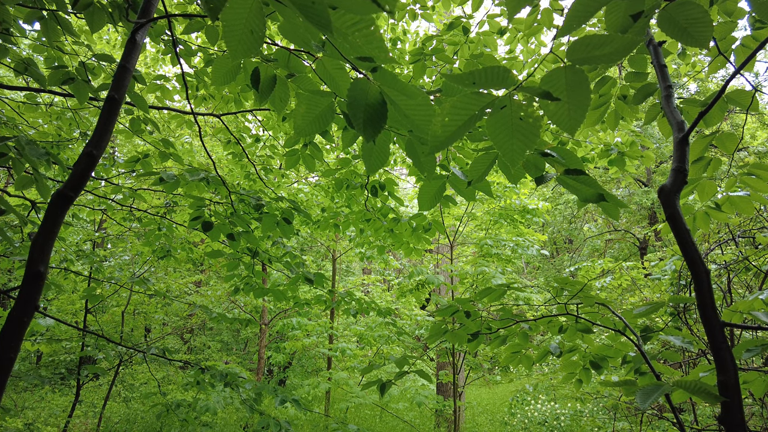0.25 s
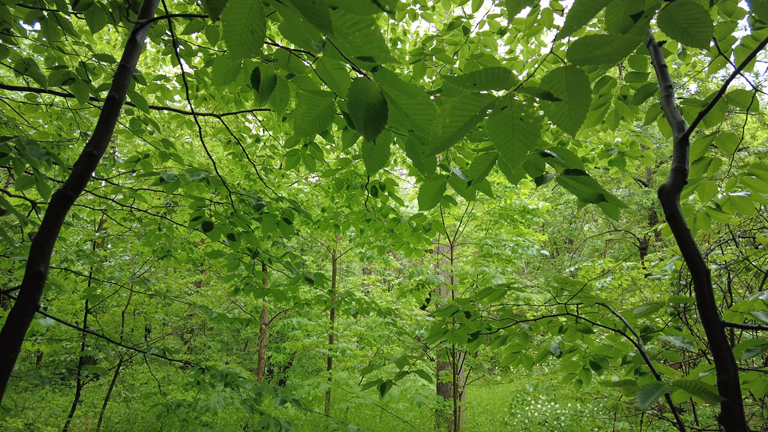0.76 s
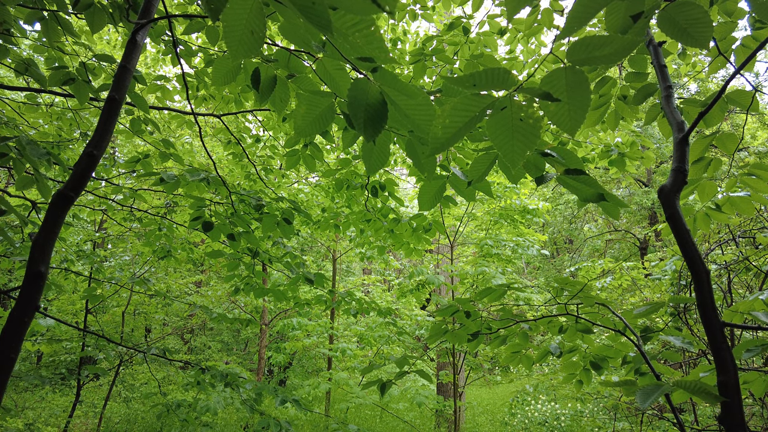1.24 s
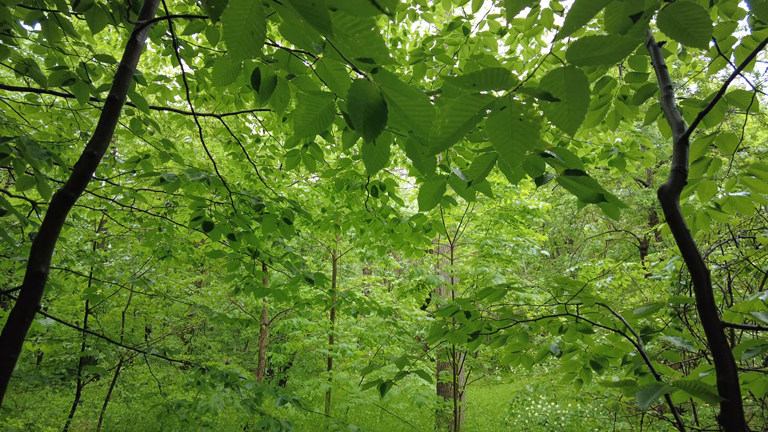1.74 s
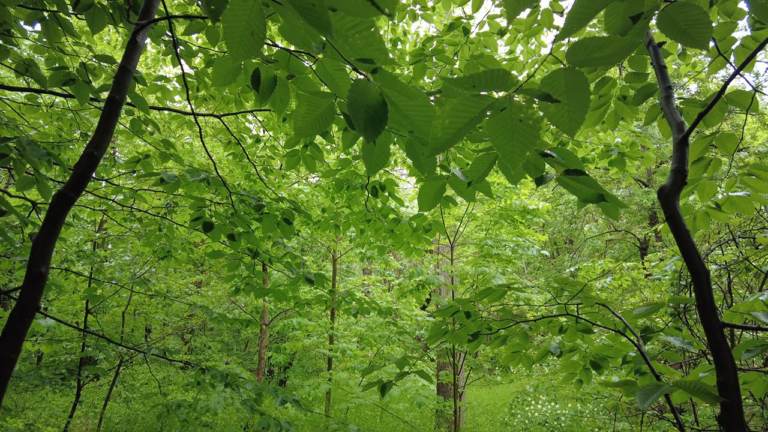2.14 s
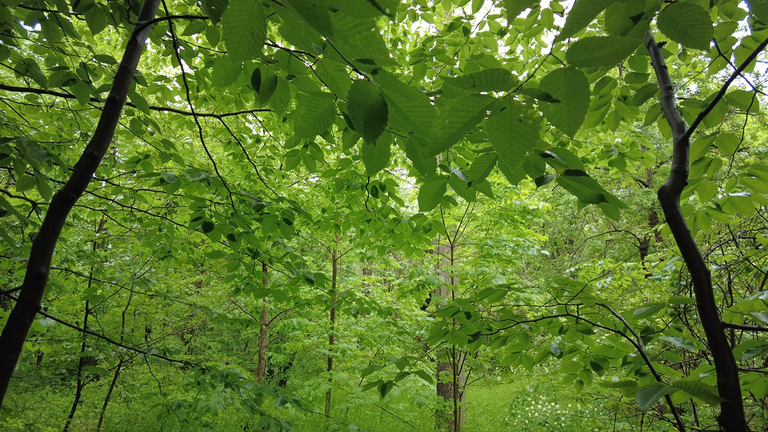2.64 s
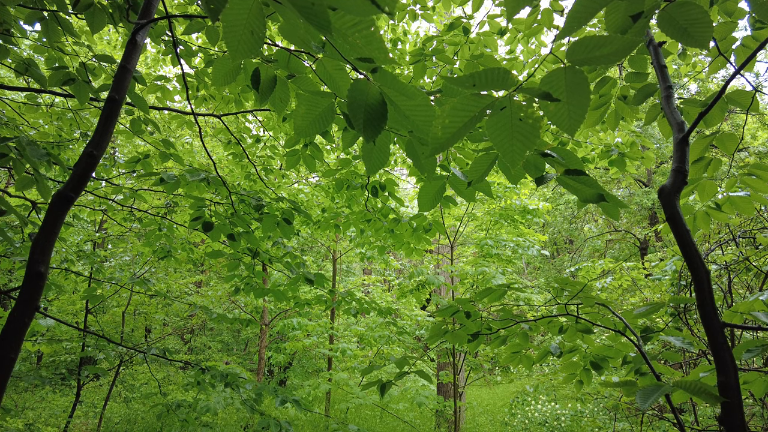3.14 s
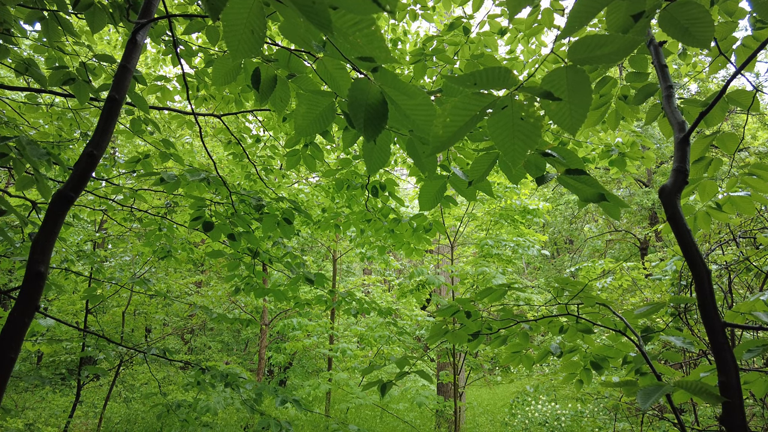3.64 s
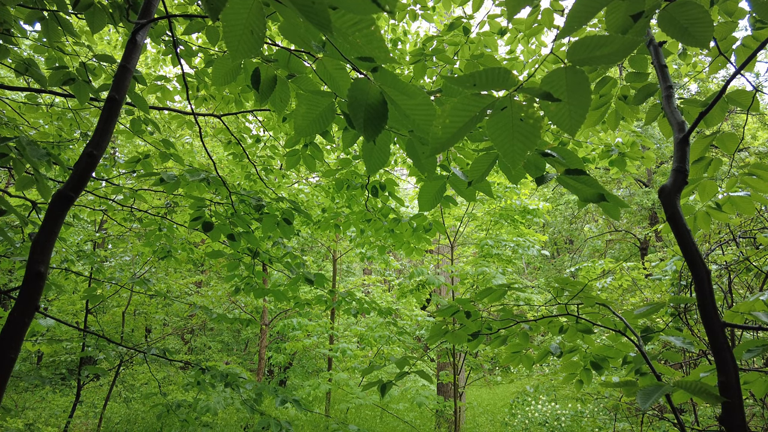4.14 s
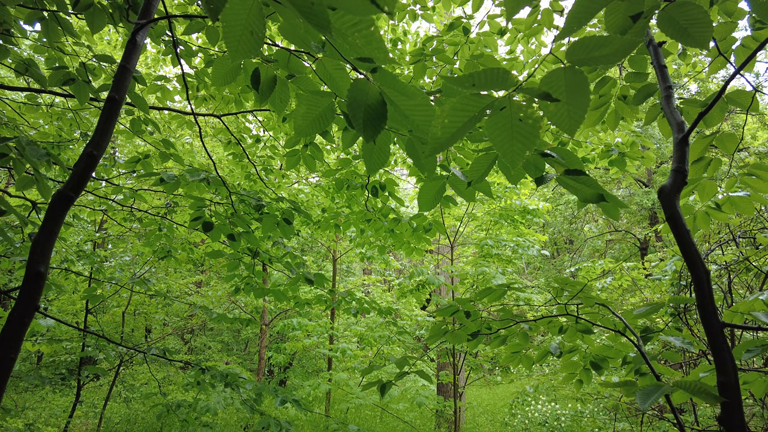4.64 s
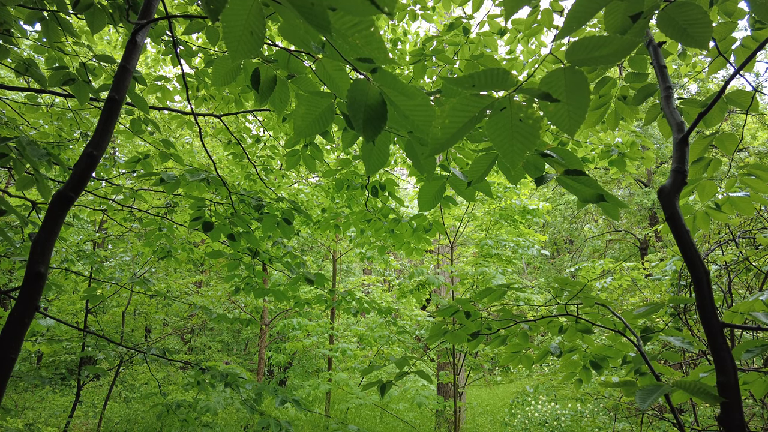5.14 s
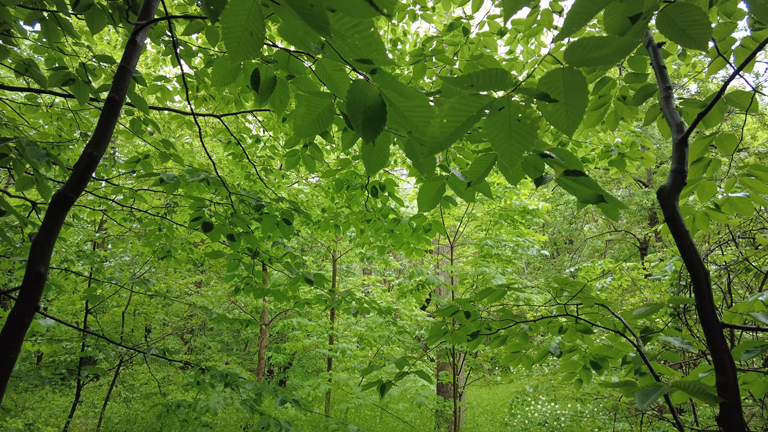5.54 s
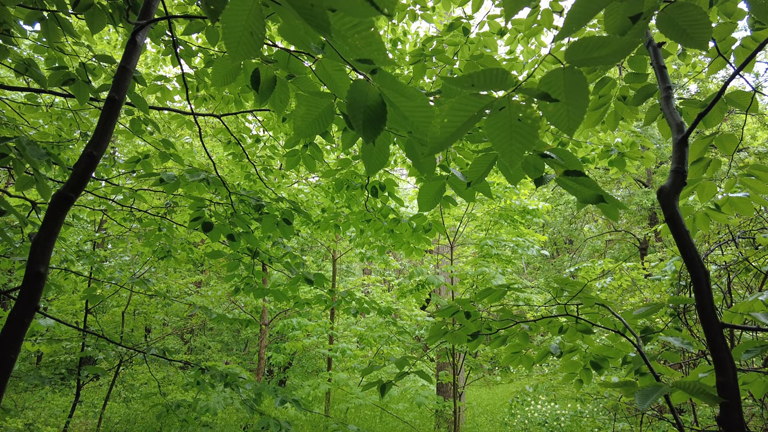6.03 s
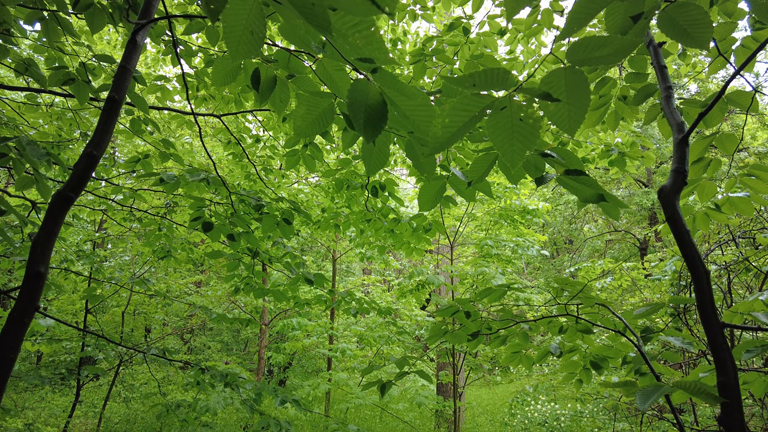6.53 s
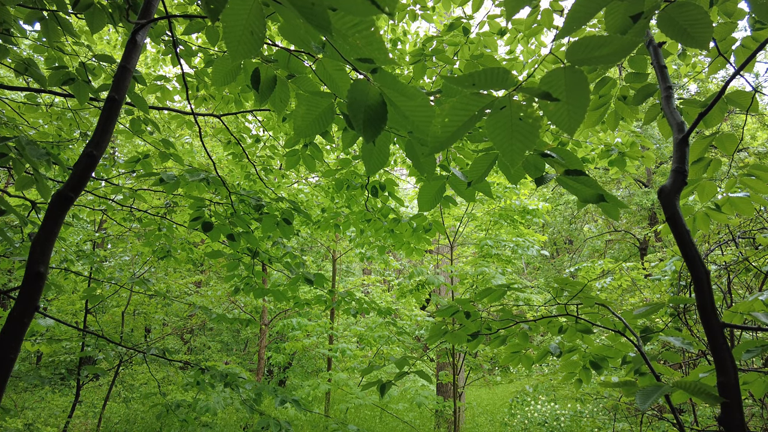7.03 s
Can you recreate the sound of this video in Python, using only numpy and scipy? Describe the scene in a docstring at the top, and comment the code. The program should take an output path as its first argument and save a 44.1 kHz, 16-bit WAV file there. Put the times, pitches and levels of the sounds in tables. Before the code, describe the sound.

A leafy wood in light rain, heard in stereo from beneath the branches for about seven seconds. Nearby drops hit leaves irregularly, with soft dull slaps, bright ticks and tiny pings; they are busiest from 0.5 to 2 seconds, with a heavy, lower plop near 1.7, a cluster around 2.6, sparser drops from 3 to 4, then more from 5 to 6 and a firm tap near 6.9. Some shed quick, fine patters. Softer drops surround them, blending into a faint airy hiss with diffuse echoes. A dominant deep rumble of distant traffic runs throughout, wavering most around 4 seconds, with muffled roar and short hollow swells, frequent after 3. A low engine hum pulses and falls until about 2.9; a weaker one grows from 3.6 to 5.7. Very faint, thin bird calls occur near 2.4, 3.2, 4.0, 4.5 and 6.5.

```python
"""A leafy wood in light rain. Drops excite nearby leaves: filtered bursts give a dull slap, a bright tick and a ping.
Shed droplets patter as random impulses, farther drops are softer, and the farthest merge into shaped noise.
Foliage scatters the drops as decaying random echoes. Distant traffic is an uneven rumble with hollow swells,
two engines are falling tones, and small birds give a few faint, thin calls as trilled sine tones."""
import sys
import numpy as np
from scipy import signal
from scipy.fft import rfft, irfft
from scipy.io import wavfile
from scipy.ndimage import uniform_filter1d

SR = 44100
rng = np.random.default_rng(int(sys.argv[2]) if len(sys.argv) > 2 else 0)


def wav_record(signal):
    """Record a signal, one row per channel, as 16-bit PCM in the file named by sys.argv[1]."""
    frames = np.transpose(np.atleast_2d(signal))
    bounded = np.clip(frames, -1, 1)
    # unit amplitude maps onto the largest positive 16-bit level
    quanta = np.round(bounded * 32767).astype(np.int16)
    wavfile.write(sys.argv[1], SR, quanta)


N = 321048
TIME = np.arange(N) / SR

# near drops; a hard strike has a high top: start_s, leaf_hz, leaf_db, spray_hz, spray_db,
# spatter_db (relative to the first burst), top_hz
NEAR_DROPS = [(.072, 2400, -71, 4440, -79, -3, 8000), (.123, 1410, -64.5, 4500, -66, -11, 6000),
              (0.507, 1830, -64, 6060, -61, -1, 17000), (0.6512, 1510, -64, 3020, -83, -1, 8000),
              (.6995, 1080, -64, 4900, -72, -8, 17000), (0.773, 1500, -66.5, 6000, -77, -4, 8000),
              (.859, 2400, -76, 3830, -86, -4, 7000), (0.94, 3400, -78, 3780, -69, 9, 8000),
              (0.976, 2470, -56, 6260, -59, -4, 16000), (1.054, 2800, -69, 5550, -77, 4, 9000),
              (1.1176, 2390, -64.5, 4460, -74, 3, 9000), (1.123, 2600, -73, 4500, -72, -2, 9000),
              (1.298, 3420, -66, 4500, -66.5, 13, 11000), (1.3702, 1990, -62.5, 3350, -71, 2, 4500),
              (1.383, 2480, -57, 6400, -61.5, -22, 9200), (1.537, 2400, -79, 4500, -71.5, 2, 9000),
              (1.628, 2400, -72, 3080, -77, -1, 4500), (1.6692, 1500, -58, 4430, -55.5, 5, 12000),
              (1.6878, 556, -50.5, 2900, -54, -25, 3780), (1.6888, 1530, -55, 3400, -61, -12, 4500),
              (1.794, 2400, -73, 3300, -78, -6, 4500), (1.8305, 1360, -62.5, 4550, -70, 3, 12000),
              (2.0193, 1490, -60.5, 3810, -65.5, -3, 9000), (2.157, 2000, -70, 4500, -79, -2, 7000),
              (2.547, 2510, -66.5, 3900, -75, 1, 5500), (2.585, 1860, -66, 2980, -72, -6, 4000),
              (2.618, 3400, -72, 5500, -73, 13, 11000), (2.631, 3000, -72, 5200, -72, 0, 9000),
              (2.666, 1400, -60, 3140, -56, 1, 8000), (2.673, 2620, -67, 5270, -64, 2, 12000),
              (2.793, 1840, -74, 3000, -70, 0, 9000), (2.853, 2400, -73, 4560, -75, 3, 9000),
              (3.175, 1800, -65.5, 4000, -72, 2, 9000), (3.309, 2790, -72, 5250, -72, -1, 12000),
              (3.49, 900, -60.5, 3180, -66, 11, 14000), (4.012, 800, -79, 4700, -66.5, 9, 5500),
              (4.11, 1490, -66, 4000, -70, -5, 6000), (4.1454, 3150, -62.5, 4670, -67, 1, 11000),
              (4.349, 2240, -69, 3030, -71, -8, 8000), (4.447, 2200, -68.5, 2800, -77, 1, 5000),
              (4.483, 2400, -77, 3100, -80, 0, 4000), (4.615, 796, -64, 2500, -78, -4, 3000),
              (4.8, 1890, -67, 8200, -74, -3, 13000), (4.831, 2000, -75, 3030, -72, 5, 6000),
              (4.991, 2190, -63.5, 4900, -77, -5, 7000), (5.034, 1600, -63, 4200, -71, -6, 14000),
              (5.0717, 1900, -63, 6400, -64.5, -5, 17000), (5.3298, 2260, -64.5, 5200, -72, 9, 8000),
              (5.4096, 2790, -65.5, 6500, -75, 18, 15000), (5.4372, 2500, -60.5, 6500, -71, 6, 14000),
              (5.5089, 790, -58, 3150, -63, 3, 12000), (5.648, 795, -59.5, 4970, -69, -6, 8000),
              (5.696, 1830, -57, 5500, -69, -2, 11000), (5.725, 2300, -69, 3000, -73, -4, 5000),
              (5.8318, 1500, -60, 5140, -67.5, 1, 14000), (5.924, 2400, -68.5, 4000, -77, -2, 7000),
              (5.945, 2510, -65.5, 6040, -74, 7, 13000), (6.201, 2500, -70, 5530, -74, 0, 12000),
              (6.421, 2400, -68, 4500, -73, -5, 10000), (6.524, 3400, -70, 8300, -71.5, 6, 16000),
              (6.732, 2020, -64, 4040, -72, -3, 8000), (6.786, 2500, -68, 5500, -71, 5, 10000),
              (6.858, 1640, -54.5, 2670, -75, -4, 3000), (6.989, 1500, -68, 4400, -70.5, -9, 5500)]
# modes of a taut, wet leaf: ratio (to the spray's pitch), level_db (before a random change), t60_s
LEAF_PING_MODES = [(1.001, 20, 0.011), (1.37, -13, .005), (1.88, 0, 0.005)]
# droplets thrown onto lower leaves: start_s, rise_s (to the thickest patter), level_db (at the thickest)
DROPLET_PATTERS = [(.508, 0.012, -67.5), (.925, 0.033, -72), (.978, 0.008, -69), (1.05, 0.014, -80),
                   (1.12, 0.014, -78), (1.292, 0.016, -74), (1.525, 0.01, -75), (1.675, 0.019, -68),
                   (2.61, .018, -72), (2.669, 0.011, -67), (2.83, 0.013, -74), (4.15, 0.031, -74),
                   (4.91, 0.022, -73), (5.074, 0.017, -72), (5.325, 0.024, -77), (5.405, .026, -73),
                   (5.53, 0.016, -74), (6.79, 0.028, -74)]
# colour of that patter: frequency_hz, density_db (relative, per Hz)
PATTER_COLOUR = [(1000, -25), (2500, -5), (4400, 1.5), (8000, -6.5), (12000, -7.5), (15500, -13)]
# colour of the farthest rain: frequency_hz, density_db (relative, per Hz)
FAR_RAIN_COLOUR = [(500, -10), (1400, -1), (2200, -1.5), (3000, -0.5), (3700, -4.5), (4600, -4.5),
                   (6300, -7), (8000, -9.5), (10000, -13), (12300, -14.5), (13500, -31), (16000, -17.5)]
# course of the far rain, of which a fraction of the departure from the mean is heard: time_s, strength_db
FAR_RAIN_STRENGTH = [(0.0, -75), (0.61, -80.5), (1.28, -79.5), (2.37, -82), (2.64, -76), (3.81, -82),
                     (5.6, -76.5), (5.98, -78.5), (7.28, -82)]
# colour of the traffic's deep rumble: frequency_hz, density_db (relative, per Hz)
RUMBLE_COLOUR = [(18, -5), (38, 2), (50, -4), (62, -1.5), (85, -6), (120, -12.5), (185, -26), (300, -40),
                 (1000, -89)]
# course of that rumble: time_s, level_db
RUMBLE_COURSE = [(0, -36.5), (.17, -40), (.4, -41), (.53, -39.5), (.7, -39.5), (.95, -40.5), (1.15, -41.5),
                 (1.28, -38), (2.2, -39.5), (2.52, -40), (2.7, -41.5), (3.15, -39), (3.33, -38.5),
                 (3.55, -40), (3.76, -39), (3.85, -41.5), (3.95, -46), (4.06, -36.5), (4.17, -45.5),
                 (4.3, -38), (4.42, -43.5), (4.6, -39), (4.85, -42), (5.05, -40), (5.24, -43.5),
                 (5.55, -43.5), (5.66, -37), (5.8, -40), (6.2, -40.5), (6.5, -40.5), (6.72, -38.5),
                 (6.9, -43), (7.03, -37.5), (7.28, -42)]
# colour of the tyre roar: frequency_hz, density_db (relative, per Hz)
ROAR_COLOUR = [(60, -3.5), (185, -7.5), (245, 0.5), (330, -3), (430, -10), (560, -12), (810, -9),
               (960, -15), (1130, -20.5), (1300, -19), (2600, -36.5), (9000, -77)]
# likeness of the traffic in both ears: frequency_hz, correlation (-1 to 1)
EAR_CORRELATION = [(25, 0.95), (70, 0.99), (150, 0.98), (300, 0.87), (450, 0.64), (700, 0.23),
                   (1050, -0.39), (1400, 0.89), (2600, 0.12)]
# hollow swells in the road noise: centre_s, pitch_hz, level_db (at the centre)
ROAD_SWELLS = [(1.05, 804, -64), (2.02, 817, -70), (2.38, 830, -68), (3.1, 806, -61.5), (3.38, 823, -66),
               (3.57, 870, -69), (3.82, 843, -62), (4.13, 840, -72), (4.38, 873, -64.5), (4.62, 820, -66),
               (4.78, 780, -70), (4.98, 777, -66), (5.17, 790, -64.5), (5.32, 854, -64), (5.68, 820, -62),
               (5.87, 803, -64.5), (6.04, 820, -64), (6.27, 820, -65.5), (6.46, 796, -65),
               (6.66, 790, -61.5), (6.85, 804, -68.5), (7.0, 784, -64.5), (7.2, 750, -65)]
# slowing of each engine, one row: time_s, firing_hz (at that time), fall_octaves_per_s
NEARER_ENGINE_PITCH = (0, 91.4, 0.071)
FARTHER_ENGINE_PITCH = (3.6, 124.7, 0.32)
# course of each engine, before its flutter: time_s, level_db
NEARER_ENGINE_LEVEL = [(0, -43), (.13, -36.5), (.21, -47), (.31, -38.5), (.4, -49), (.49, -37.5), (.6, -52),
                       (.78, -38), (1.15, -45.5), (1.45, -63), (1.9, -38.5), (2.08, -56.5), (2.35, -41),
                       (2.55, -55), (2.7, -41.5), (2.95, -88)]
FARTHER_ENGINE_LEVEL = [(3.1, -75), (3.6, -57), (4.6, -51), (5.6, -45), (5.95, -87)]
# bird calls before scattering: start_s, length_s, start_hz, end_hz, level_db (at mid-call),
# trill_octaves (scaled by a random factor near 1.3)
BIRD_CALLS = [(2.39, 0.041, 8300, 8400, -82, .12), (2.448, .11, 7270, 7200, -79, .2),
              (3.172, .18, 2520, 2260, -80, .015), (3.371, .1, 2400, 2770, -84, .015),
              (4.048, .14, 7700, 7700, -83, .08), (4.525, .1, 7200, 7230, -77, .24),
              (4.62, .12, 7300, 7400, -86, .14), (6.497, 0.14, 2740, 2730, -82, 0.0097)]


def near_drops():
    """Impact excitation: drops strike leaves overhead, and higher, finer spray has a wider band."""
    rows = []
    for s, leaf_hz, leaf_db, spray_hz, *strike in NEAR_DROPS:
        spray_octaves = 0.45 * spray_hz / 4500
        rows.append((s, leaf_hz, leaf_db, spray_hz, spray_octaves, *strike, 0))  # centred
    return shower(rows)


def drop(leaf_hz, leaf_db, spray_hz, spray_octaves, spray_db, spatter_db, top_hz,
         spatter_s=0.0078, leaf_octaves=1.54, flex_db=-7, ring_db=-9, ping_db=-8, rebound_db=-4):
    """Forced resonance: a burst on a leaf drives a slap, a brief ring and the spray's tick and ping."""
    t = TIME[:SR // 25]
    # the drop flattens within about a millisecond and rebounds once
    burst = .8 * unit(rng.standard_normal((2, len(t))) * np.exp(-t / .0013))
    burst[:, 0] += .7
    rebound = np.roll(burst, int(rng.uniform(.0007, .0025) * SR), axis=1)
    burst = unit(burst + undb(rebound_db) * rebound)
    # then its droplets, of uneven strength, land around it
    uneven = undb(4.6 * rng.standard_normal(len(t)))
    droplets = unit(rng.standard_normal((2, len(t))) * uneven * t * np.exp(-t / (spatter_s / 2)))
    blow = burst + undb(spatter_db) * droplets
    # a yielding leaf softens the strike
    blow = lowpass(blow, 2, min(top_hz, .45 * SR))
    # the blade rings for a few cycles, and its flexing adds a broad knock under the slap
    ring = unit(band(blow, leaf_hz * 0.86, 0.12, order=1))
    slap = unit(unit(band(blow, leaf_hz, leaf_octaves)) + undb(ring_db) * ring)
    flex = unit(band(blow, leaf_hz * 0.53, 1.6))
    # the tick has a long skirt into the treble
    spray = band(blow, spray_hz, spray_octaves, order=1)
    tick = unit(band(spray, 8500, 3.4, order=1))
    pinging = unit(signal.fftconvolve(blow, ping(t, spray_hz)[None], axes=1)[:, :len(t)])
    tick = unit(tick + undb(ping_db) * pinging)
    sound = undb(leaf_db) * (slap + undb(flex_db) * flex) + undb(spray_db) * tick
    return sound * np.sqrt(SR / 100)  # levels count the energy as spread over 10 ms


def ping(t, hz):
    """Modal decay: a few short, high modes, whose balance differs from leaf to leaf."""
    out = np.zeros(len(t))
    for ratio, db, t60 in LEAF_PING_MODES:
        decay = undb(db + 2 * rng.standard_normal() - 60 * t / t60)
        out += decay * np.sin(2 * np.pi * hz * ratio * t)
    return out


def shower(rows):
    """Superposition: each drop is added at its time and its level difference between the ears."""
    out = np.zeros((2, N + SR))
    for s, *shape, pan_db in rows:
        sound, start = drop(*shape), max(int(s * SR), 0)
        out[:, start:start + sound.shape[1]] += sound * undb(pan(pan_db))
    return out[:, :N]


def sprinkles(droplets_per_s=3500, spread_db=2):
    """Random impulses: tiny droplets shed by a struck leaf thicken quickly and thin out raggedly."""
    landings = (rng.random(N) < droplets_per_s / SR) * undb(spread_db * rng.standard_normal(N))
    ticks = landings * rng.standard_normal((2, N))
    patter = level(irfft(rfft(ticks) * undb(per_bin(PATTER_COLOUR)), N), 0)
    strength = np.zeros(N)
    for s, rise_s, db in DROPLET_PATTERS:
        age = np.maximum(TIME - s, 0) / rise_s
        strength += undb(db) * age * np.exp(1 - age)
    return patter * strength


def farther_drops(count=340, leaf_hz=2100, leaf_db=-79.5, spray_hz=3700, spray_octaves=0.3,
                  spray_db=-83.0, spread_db=1.1, spatter_db=2, top_hz=8000):
    """Size and pitch: softer drops on surrounding trees, where small leaves sound higher and softer."""
    times = (np.arange(count) + rng.uniform(-3, 3, count)) % count * N / SR / count
    rows = []
    for s, chances in zip(times, rng.uniform(-1.6, 1.6, (count, 5))):
        size, leaf, spray, wet, side = chances
        drop_leaf_hz = leaf_hz * 2 ** (0.51 * leaf)
        drop_leaf_db = leaf_db + spread_db * size - 1.1 * leaf
        drop_spray_hz = spray_hz * 2 ** (0.53 * spray)
        drop_spray_db = spray_db + spread_db * size + wet - spray
        rows.append((s, drop_leaf_hz, drop_leaf_db, drop_spray_hz, spray_octaves, drop_spray_db,
                     spatter_db, top_hz, 1.8 * side))
    return shower(rows)


def foliage(x, near_s=0.011, far_t60=0.22, far_db=-5, dull_hz=8000):
    """Multiple scattering: quick echoes from leaves close by, then a duller tail from the trunks."""
    t = TIME[:SR]
    close, far = rng.standard_normal((2, 2, SR))
    close = unit(close * np.exp(-t / near_s))
    far = lowpass(far, 1, min(dull_hz, SR / 3))
    far = unit(far * undb(-60 * t / far_t60) * (1 - np.exp(-t / near_s)))
    echoes = (close + undb(far_db) * far) * (t > .002)  # none in the first 2 ms
    return signal.fftconvolve(x, echoes, axes=1)[:, :N]


def far_rain(wash_db=-73.5, follow=0.43, flicker_db=1.0):
    """Statistical merging: drops too many and far to tell apart become noise with soft flurries."""
    s, db = np.transpose(FAR_RAIN_STRENGTH)
    flurry_db = follow * np.interp(TIME, s, db - np.mean(db))
    return level(noise(FAR_RAIN_COLOUR), wash_db) * undb(flurry_db + flicker_db * walk(45))


def traffic(roar_db=-53.5, swell_db=-0.04, pan_db=1.05, rumble_pan_db=-0.9):
    """Low-frequency propagation: a far road dulled by the wood, its bass uneven and alike in both ears."""
    likeness = per_bin(EAR_CORRELATION)
    rumble = noise(RUMBLE_COLOUR, likeness)
    # even out the noise over half a second, then impose the course
    even = rumble / np.sqrt(uniform_filter1d(np.mean(rumble ** 2, axis=0), size=SR // 2))
    rumble = even * undb(course(RUMBLE_COURSE) + pan(rumble_pan_db))
    roar = level(noise(ROAR_COLOUR, likeness), roar_db)
    return rumble + roar * undb(swell_db * walk(3.72) + pan(pan_db))


def engine(pitch, levels, waver=0.011, flutter_db=2.6, octave_db=-30):
    """Harmonic radiation: the exhaust's lowest tones sink in pitch and flutter on their way through the trees."""
    at_s, start_hz, octaves_per_s = pitch
    hz = start_hz * 2 ** (-octaves_per_s * (TIME - at_s))
    phase = 2 * np.pi * np.cumsum(hz * (1 + waver * walk(13))) / SR
    gain = undb(course(levels, left=-120, right=-120) + flutter_db * walk(25))
    return gain * level(np.sin(phase) + undb(octave_db) * np.sin(2 * phase), 0)


def tyre_song(hz, db, likeness=0, wander=.045, width_hz=100, swell_db=3.0):
    """Modulated carrier: a narrow band of the road noise wanders in pitch and strength."""
    carrier = np.exp(2j * np.pi * np.cumsum(hz * (1 + wander * walk(9))) / SR)
    mid, side = [(carrier * (walk(width_hz) + 1j * walk(width_hz))).real for _ in range(2)]
    return level(two_ears(mid, side, likeness) * undb(swell_db * walk(7.3)), db)


def swells(half_length_s=0.042, octaves=0.14, likeness=0.42):
    """Band-limited noise: brief, hollow swells stand out of the road noise, each at its own pitch."""
    out = np.zeros((2, N + SR))
    t = TIME[:SR // 2] - 1 / 4
    for s, hz, db in ROAD_SWELLS:
        mid, side = level(band(rng.standard_normal((2, len(t))), hz, octaves), db)
        start = int((s + t[0]) * SR)
        ears = two_ears(mid, side, likeness) / np.sqrt(2)
        out[:, start:start + len(t)] += ears * np.exp(-(t / half_length_s) ** 2 / 2)
    return out[:, :N]


def bird(trill_hz=140, quaver=.012):
    """Frequency modulation: thin calls buzz with a trill dipping under the note, heard only through foliage."""
    out = np.zeros(N)
    for s, length, start_hz, end_hz, db, depth in BIRD_CALLS:
        along = np.clip((TIME - s) / length, 0, 1)
        cycles = np.cumsum(trill_hz * (1 + .2 * walk(60))) / SR
        swing = np.abs(2 * (cycles % 1) - 1)
        dip = swing ** 2 * (1.3 + .3 * walk(100))
        glide = start_hz + (end_hz - start_hz) * along
        hz = glide * (1 + quaver * walk(250)) * 2 ** (-depth * dip)
        arch = np.sqrt(8 * along * (1 - along))
        out += undb(db) * arch * np.sin(2 * np.pi * np.cumsum(hz) / SR)
    return foliage(np.array([out, out]))


def undb(db):
    """Logarithmic level: decibels to amplitude gain."""
    return 10 ** (np.asarray(db) / 20)


def level(x, db):
    """Mean power: scale to an rms level."""
    return x * undb(db) / np.sqrt(np.mean(x ** 2) + 1e-30)


def unit(x):
    """Energy normalization: unit energy per channel, on average."""
    return x / np.sqrt(np.mean(np.sum(x ** 2, axis=-1)))


def pan(db):
    """Interaural level difference: half of it up in the first ear, half down in the second."""
    return db * np.array([[.5], [-.5]])


def two_ears(mid, side, likeness):
    """Interaural correlation: shares of common and opposed sound set the likeness of the ears."""
    c = np.clip(likeness, -1, 1)
    return mid * np.sqrt(1 + c) + side * np.sqrt(1 - c) * np.array([[1], [-1]])


def course(points, **ends):
    """Linear interpolation: read (time_s, value) points along the whole scene."""
    return np.interp(TIME, *np.transpose(points), **ends)


def per_bin(points):
    """Logarithmic frequency: read (frequency_hz, value) points at each spectral bin."""
    hz, value = np.transpose(points)
    return np.interp(np.log(np.fft.rfftfreq(N, 1 / SR) + 1), np.log(hz), value)


def noise(spectrum, likeness=0):
    """Spectral shaping: stereo noise of a given colour and correlation between the ears."""
    mid, side = rfft(rng.standard_normal((2, N))) * undb(per_bin(spectrum))
    return irfft(two_ears(mid, side, likeness), N)


def walk(rate):
    """Smoothed randomness: levels held 1 / rate s and slewed twice, with a spread near 1."""
    k = max(int(SR / rate), 2)
    held = np.repeat(rng.standard_normal(N // k + 3), k)
    return 1.3 * uniform_filter1d(uniform_filter1d(held, k), k)[k:k + N]


def band(x, hz, octaves, order=2):
    """Damped resonance: pass a band centred on a pitch."""
    edges = np.clip(hz * 2 ** (np.array([-.5, .5]) * octaves), 20, [.4 * SR, .48 * SR])
    return signal.sosfilt(signal.butter(order, edges, "band", fs=SR, output="sos"), x)


def lowpass(x, order, hz):
    """Treble loss: attenuate sound above a cutoff."""
    return signal.sosfilt(signal.butter(order, hz, fs=SR, output="sos"), x)


def scene(near_scatter_db=-6.5, far_scatter_db=-2):
    """Direct and scattered sound: near drops are mostly direct, farther ones more scattered by other trees."""
    near, farther = near_drops(), farther_drops()
    scattered = foliage(undb(near_scatter_db) * near) + foliage(undb(far_scatter_db) * farther)
    rain = near + sprinkles() + farther + scattered + far_rain()
    songs = tyre_song(hz=327.3, db=-64.0, likeness=.85) + tyre_song(hz=1400, db=-81.0)
    road = traffic() + songs + swells()
    engines = (engine(NEARER_ENGINE_PITCH, NEARER_ENGINE_LEVEL)
               + engine(FARTHER_ENGINE_PITCH, FARTHER_ENGINE_LEVEL))
    return rain + road + engines + bird()


def record(dry, bass_hz=17, top_hz=15900):
    """Band limitation: the deepest bass is reduced and the extreme treble cut steeply."""
    dry = signal.sosfilt(signal.butter(2, bass_hz, "high", fs=SR, output="sos"), dry)
    return signal.sosfilt(signal.ellip(8, .2, 70, top_hz, fs=SR, output="sos"), dry)


dry = scene()
out = record(dry)
wav_record(out)
```